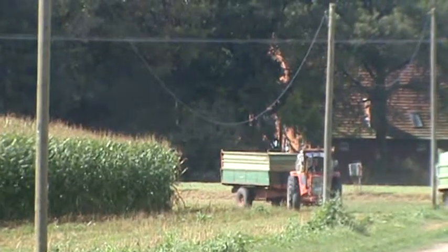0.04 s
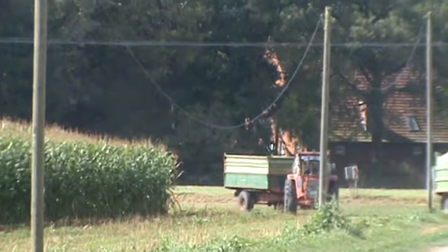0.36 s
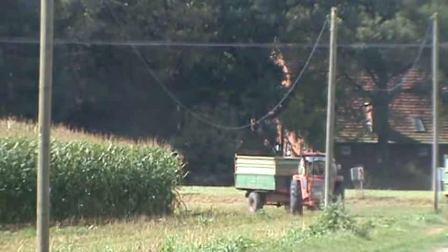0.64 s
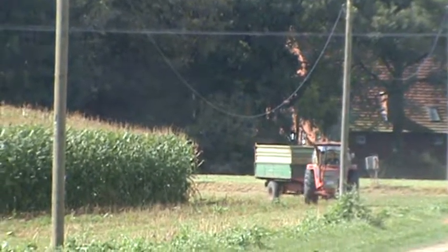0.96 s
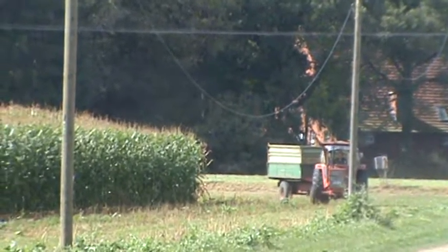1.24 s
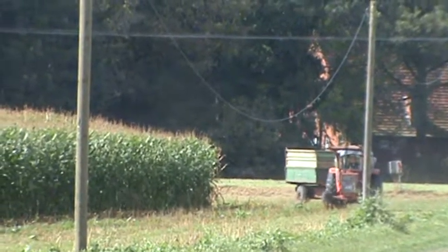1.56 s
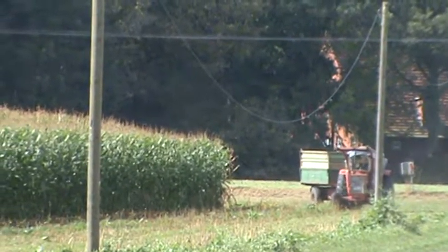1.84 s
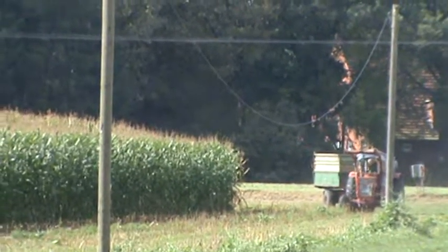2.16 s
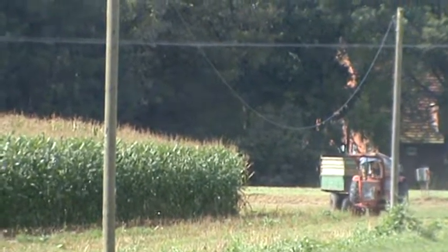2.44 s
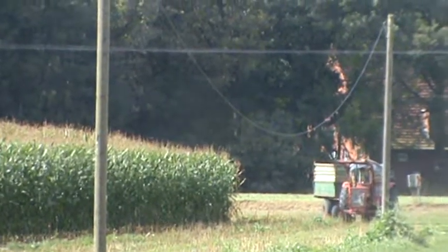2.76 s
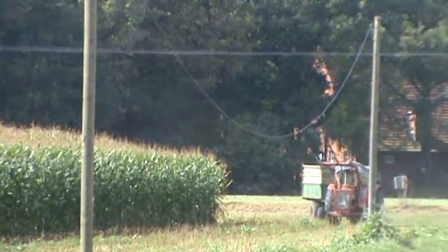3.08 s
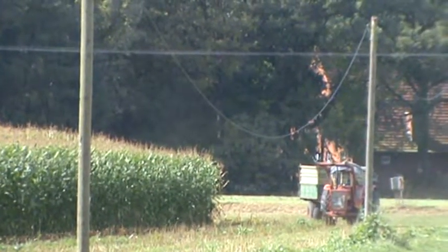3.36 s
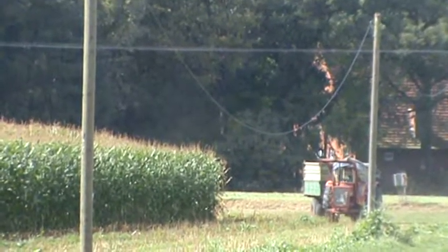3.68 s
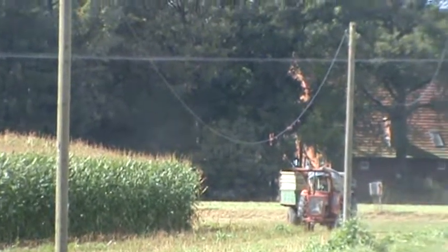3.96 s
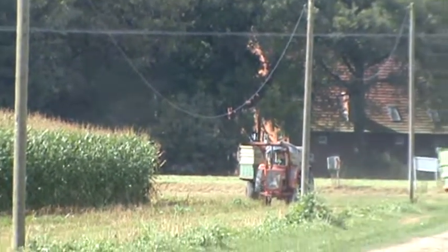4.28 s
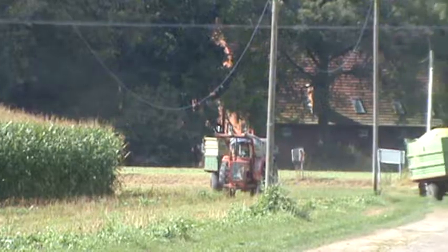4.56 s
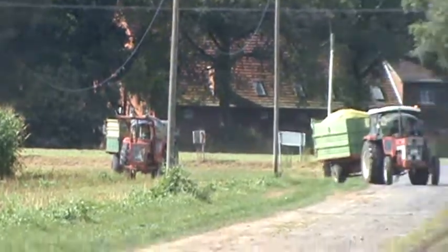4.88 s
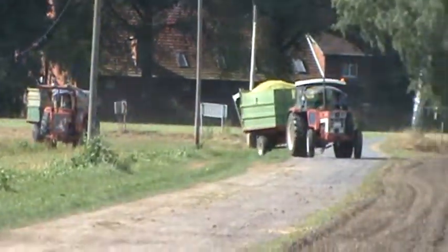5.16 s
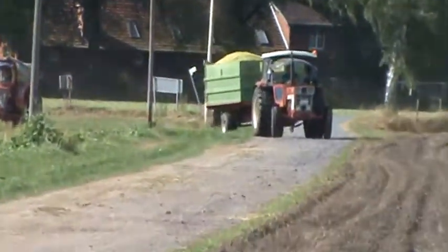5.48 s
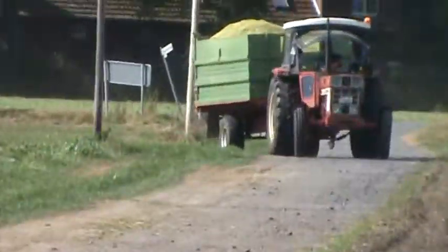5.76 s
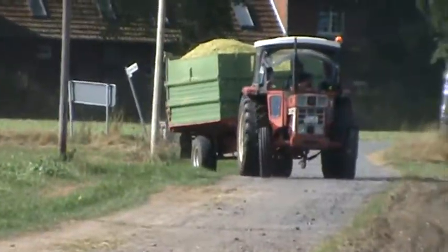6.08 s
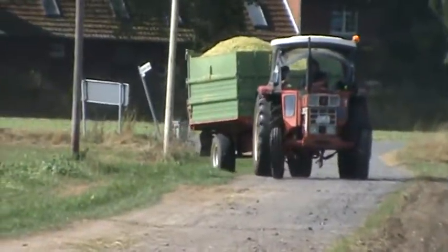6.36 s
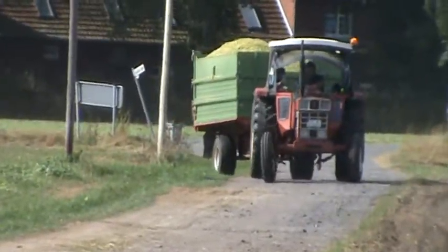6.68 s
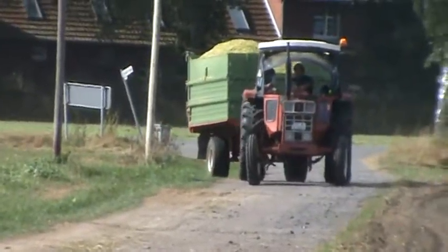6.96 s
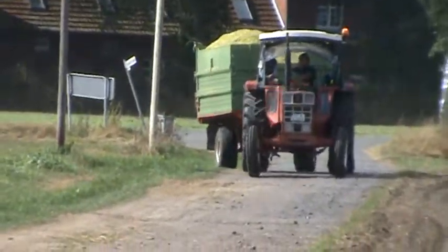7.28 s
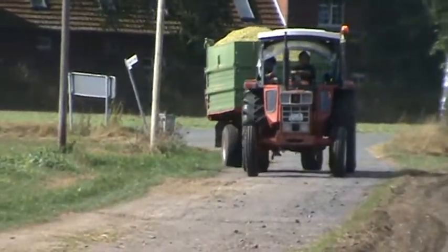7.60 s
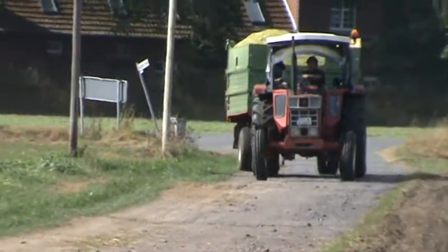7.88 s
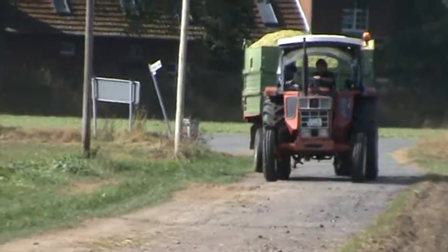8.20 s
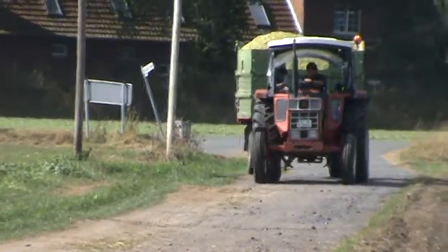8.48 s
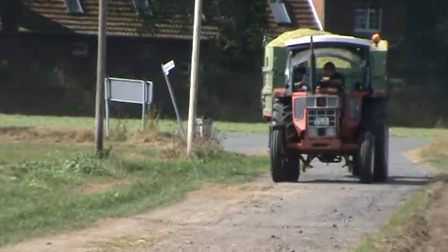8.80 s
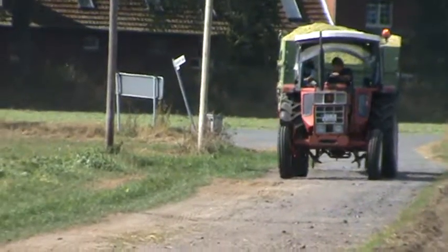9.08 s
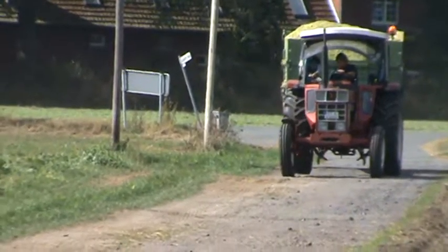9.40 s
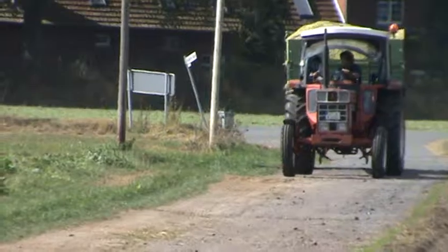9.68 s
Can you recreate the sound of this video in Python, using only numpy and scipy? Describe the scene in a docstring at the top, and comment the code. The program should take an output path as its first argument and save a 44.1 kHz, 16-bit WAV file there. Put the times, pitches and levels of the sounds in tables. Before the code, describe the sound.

Two tractors and a harvester make a low, steady diesel drone with a hiss of machinery, some way off across a field and slightly to the right. A cricket gives three high, scratchy trills in the first second, each softer than the last. Soft low thuds and dull tripod knocks come around 1 second, and a small click just after 2. Light wind puffs touch the microphone from about 4 seconds. Two dry clicks just after 5 seconds lead into a faint, brief zoom whir. Near 6.7 seconds the closer tractor opens its throttle, humming louder with a diesel rattle. From about 7 seconds wind builds and buffets the microphone hard until the end near 10, the loudest sound, with sharp pops around 7.7, 8.9 and 9.5 seconds. The cricket trills faintly under the gusts. A very faint high electronic whine and hiss run throughout.

```python
"""A low diesel drone comes first: two tractors and a harvester, far off beside a maize field.
A cricket trills in the grass by scraping its wings. Low thuds sound, the camera's tripod knocks, its switch
clicks and its zoom motor whirs, over a faint whine and hiss from its electronics. The near tractor opens
its throttle and rattles. Wind puffs at the camera's two microphone openings, then buffets them hard."""
import sys
import numpy as np
from scipy import signal
from scipy.fft import rfft, irfft, next_fast_len
from scipy.io import wavfile
from scipy.ndimage import uniform_filter1d, map_coordinates

SR = 44100
rng = np.random.default_rng(int(sys.argv[2]) if len(sys.argv) > 2 else 0)


def bounce(signal):
    """Save signal as a 16-bit WAV file at the path given by the first command-line argument."""
    frames = np.transpose(np.atleast_2d(signal))
    limited = np.clip(frames, -1, 1)
    pcm = np.round(limited * 32767).astype(np.int16)
    wavfile.write(sys.argv[1], SR, pcm)


N = 433944
TIME = np.arange(N) / SR

# Levels are relative: filters and other gains act on them later. Likeness 1 means left equals right.
# how fast each tractor fires and the harvester's shaft turns: t/s, f/Hz
NEAR_RATE = [(0, 61.7), (0.8, 62.43), (1.5, 58.97), (2.1, 60.17), (2.9, 60.1), (3.6, 60.76), (5.6, 61.1),
             (6, 59.84), (6.5, 56.9), (7, 58.05), (7.5, 64.25)]
FAR_RATE = [(0, 45.76), (0.7, 43.3), (1.4, 43.57), (1.9, 42.15), (2.6, 41.36), (3.2, 39.73), (3.9, 41.4),
            (5.7, 43.3), (6.6, 45.76)]
HARVESTER_RATE = [(0, 33.3), (0.9, 33.86), (1.6, 30.78), (2.3, 32.63), (3.1, 32.7), (3.8, 33.19),
                  (5.7, 32.99), (6.3, 31.8)]
# how loud each engine hums: t/s, level/dB
NEAR_LEVEL = [(0, -45), (1.8, -39), (3.4, -43.5), (5.7, -45), (6.4, -37), (7.1, -33)]
FAR_LEVEL = [(0, -43.5), (3, -48), (5.5, -40), (6.6, -44.5)]
HARVESTER_LEVEL = [(0, -45), (1.6, -41.5), (2.5, -47), (3.2, -40), (5.6, -41), (6.3, -51)]
# the tones in each hum: multiple of the engine's rate, level/dB
NEAR_TONES = [(1, -7), (1.5, -25), (2, -4.5), (2.5, -23), (3, -15.5), (4, -17.5), (5, -14.5), (8, -26)]
FAR_TONES = [(1, -4.5), (2, 1), (3, -13), (4, -13.5), (5, -18), (7, -14)]
HARVESTER_TONES = [(4, -24), (5, -1), (6, -2), (7, -12.5), (8, -12.5), (9, -9), (10, -3.5), (11, -8.5)]
# the ground cancels the drone above this edge: t/s, f/Hz
GROUND_EDGE = [(2.3, 366), (3.2, 300), (4.2, 272.5)]
# tone colour of the exhaust roar, machinery hiss and diesel knock: f/Hz, level/dB
ROAR_COLOUR = [(20, -32), (40, -18), (60, -1.5), (130, -1), (190, 2), (250, -0.5), (310, -1), (420, -8),
               (490, 0.5), (1200, 12)]
MACHINERY_COLOUR = [(150, -20), (400, -4), (540, -9), (720, 1.5), (950, -5), (1250, -4), (1580, -7),
                    (1900, -5), (2350, -11), (2850, -10), (3300, -16.5), (5000, -22.5), (8000, -36),
                    (15000, -47)]
KNOCK_COLOUR = [(500, -23), (1200, 2), (1900, 10), (2400, 5), (3000, 7.5), (3300, -6), (3800, -1),
                (4400, -30), (7000, -41)]
# how alike the two ears hear the roar and the machinery: f/Hz, likeness
ROAR_LIKENESS = [(100, 0.87), (300, 0.93), (600, 0.36)]
MACHINERY_LIKENESS = [(200, 0.15), (700, 0.48), (1400, 0.63), (3000, 0.43), (7000, 0.15)]
# loudness of the roar and of the machinery's treble: t/s, level/dB
ROAR_LOUDNESS = [(0, -42), (2.7, -44), (4.7, -38.5), (7.1, -43)]
MACHINERY_TREBLE = [(0, 3.5), (1.3, 2), (2.2, -2), (5, -0.5), (7.8, -3.5)]
# roar and machinery swell briefly: t/s, added share/dB, half-length/s
DIN_SWELLS = [(3.08, -6, 0.054)]
# the throttle opens and the diesel knocks: t/s, length/s, level/dB
THROTTLE_BURSTS = [(2.682, .25, -59.5), (6.672, 0.557, -49.5), (7.361, 0.086, -47.5)]

# the electronics' whining tones and the colour of their hiss: f/Hz, level/dB
WHINE_TONES = [(15525, -70), (15574, -76), (15622, -61.5), (15676, -75), (15725, -79)]
HISS_COLOUR = [(100, 0), (5000, -0.038), (10000, 0), (15000, -.5)]
# how alike the two ears hear that hiss: f/Hz, likeness
HISS_LIKENESS = [(4000, 0.18), (8000, 0.43), (12000, 0.82), (15000, 1.0)]

# cricket trills, a long soft one running under the last few: t/s, length/s, level/dB, f/Hz
TRILLS = [(0.08, 0.349, -40.5, 4740), (0.444, .25, -46, 4840), (0.859, 0.32, -53, 4760),
          (7.7, 2.13, -63, 4720), (7.809, 0.21, -53, 4700), (8.11, 0.25, -57, 4710),
          (8.681, 0.094, -63, 4740), (8.9, 0.19, -66.5, 4700), (9.221, 0.14, -69, 4730),
          (9.47, 0.15, -63, 4770), (9.72, .12, -63, 4730)]
# colour of the wings' scratch and of the song scattered by grass: f/Hz, level/dB
SCRATCH_COLOUR = [(3000, -18), (4400, 0.5), (5200, 3), (5800, -11), (8200, -15.5), (11000, -34)]
GRASS_COLOUR = [(3000, -38), (4350, -9), (4700, 7), (5050, -12), (5600, -19), (9000, -55)]

# soft, low thuds from camera handling and a wind puff: t/s, level/dB, half-length/s
LOW_THUDS = [(.71, -37, 0.032), (1.2, -36, 0.057), (4.17, -36.5, 0.077), (5.18, -29.5, .012)]
# colour of those thuds: f/Hz, level/dB
THUD_COLOUR = [(20, -21), (65, 8.5), (130, 2), (260, -9), (450, -31), (1100, -29), (4000, -33.5),
               (9000, -67)]
# the tripod head jolts: t/s, level/dB
TRIPOD_JOLTS = [(1.128, -34), (1.186, -31), (1.219, -36.5)]
# the tones it rings with: f/Hz, level/dB, time to fade 60 dB/s
TRIPOD_TONES = [(76.8, 7, 0.11), (190, 5, 0.046), (780, -7, .04), (1005, -10, 0.11), (2280, -9.5, 0.053),
                (2620, -6.5, .025)]
# switch clicks: t/s, level/dB, time to fade 60 dB/s, treble limit/Hz
SWITCH_CLICKS = [(2.281, -33, .008, 9000), (5.1902, -19, 0.016, 18000), (5.3157, -24, 0.0088, 7500)]
# colour of the plastic case: f/Hz, level/dB
CASE_COLOUR = [(200, 3), (700, 4), (1800, -4), (2250, 7), (2800, -3), (6000, -6), (9000, -11.5),
               (15000, -11.5)]

# colour of the wind that both openings share, and of what differs between them: f/Hz, level/dB
WIND_MID = [(10, -21), (30, -8), (55, -3), (105, 0), (220, -3.5), (330, -11), (520, -19), (1000, -31.5),
            (2000, -47.5), (5000, -92)]
WIND_SIDE = [(10, -14), (35, -19), (80, 2.5), (150, 4), (250, 3), (400, -1.5), (650, -11), (1000, -19),
             (2000, -44), (5000, -74)]
# gusts: peak t/s, build-up/s, push/dB, flutter relative to the push/dB
WIND_GUSTS = [(4.22, 0.092, -33.5, -27), (4.82, 0.033, -36.5, -25), (5.18, 0.026, -37, -25),
              (5.46, .017, -29, -26), (6.66, 0.032, -34, -27), (7.67, 0.04, -21, -11.5),
              (7.91, 0.03, -23, -14), (8.03, 0.061, -29.5, -13), (8.32, .06, -44, -3),
              (8.46, 0.016, -19, -16.5), (8.65, 0.076, -28, -5.5), (8.76, .045, -24.5, -10),
              (8.9, 0.038, -32, -14), (9.02, .06, -31, -8.5), (9.28, 0.043, -31, -10),
              (9.47, 0.032, -25.5, -8), (9.58, 0.062, -23.5, -12.5), (9.701, 0.052, -32.5, -10),
              (9.77, 0.028, -21.5, -21.5), (9.84, 0.028, -34, -12)]
# the wind's steady push: t/s, level/dB
STEADY_WIND = [(6.8, -50), (7.15, -34), (7.55, -23.5), (8.2, -24.5), (8.8, -20), (9.3, -26), (9.84, -27)]
# sharp slaps of air: t/s, level/dB, half-length/s
AIR_SLAPS = [(7.668, -27, 0.00093), (8.413, -28, 0.0031), (8.646, -35, .003), (8.92, -41, 0.0014),
             (9.428, -30, .002), (9.456, -35, 0.0025), (9.692, -36, .002), (9.747, -33.5, .002)]
# three sharp pops break into the wind: t/s, pop height, time the rumble stays mono/s
WIND_POPS = [(7.669, 0.84, 0.13), (8.919, 0.3, 0.0019), (9.463, 0.52, 0.067)]

# zoom motor tones: start t/s, end t/s, f/Hz, top level/dB
MOTOR_TONES = [(5.37, 5.88, 11611, -68), (5.76, 5.88, 6644, -65)]
# whirs of the zoom gears: t/s, level/dB, half-length/s
GEAR_WHIRS = [(5.35, -60, .04), (5.51, -54.5, .025), (5.66, -54.5, 0.076)]
# colour of the gears: f/Hz, level/dB
GEAR_COLOUR = [(800, -13), (2000, 8), (5500, -5), (8000, -6), (15000, -17)]


def amp(db):
    """Turn decibels into a gain."""
    return 10 ** (np.asarray(db) / 20)


def unit(x):
    """Scale a signal to an average strength (rms) of 1."""
    return x / np.sqrt(np.mean(x ** 2) + 1e-20)


def along(points, hz):
    """Read between (frequency, value) points on a log frequency axis."""
    f, v = np.transpose(points)
    return np.interp(np.log(hz + 1), np.log(f + 1), v)


def curve(points):
    """Join (time, value) points with straight lines."""
    return np.interp(TIME, *np.transpose(points))


def wobble(rate):
    """A smooth random curve through `rate` points a second."""
    return map_coordinates(rng.standard_normal(int(N * rate / SR) + 4), [TIME * rate])


def filtered(x, response):
    """Scale each frequency in x by response(hz)."""
    size = next_fast_len(N + 8192)
    return irfft(rfft(x, size) * response(np.fft.rfftfreq(size, 1 / SR)), size)[..., :N]


def noise(colour):
    """Noise of strength 1 with the given tone colour."""
    return unit(filtered(rng.standard_normal(N), lambda hz: amp(along(colour, hz))))


def stereo(mid, side):
    """Left and right from what they share (mid) and what sets them apart (side)."""
    return np.array([mid + side, mid - side])


def wide(colour, likeness):
    """Stereo noise: the less alike its two sides, the wider it sounds."""
    apart = lambda hz: np.tan(np.arccos(np.clip(along(likeness, hz), -.9, 1)) / 2)
    return stereo(noise(colour), filtered(noise(colour), apart))


def sine(hz, db):
    """A steady tone with a random starting phase."""
    return np.sqrt(2) * amp(db) * np.sin(2 * np.pi * hz * TIME + rng.uniform(0, 2 * np.pi))


def swells(rows):
    """Bell-shaped rises of level."""
    return sum(amp(db) * np.exp(-.5 * ((TIME - s) / half) ** 2) for s, db, half in rows)


def burst(start, length, attack_s, release_s, growth_db):
    """Fade in, grow to half of growth_db below full level, then fade out."""
    age, hold = TIME - start, max(length, attack_s)
    gate = np.interp(age, [0, attack_s, hold, hold + release_s], [0, 1, 1, 0])
    return gate * amp(growth_db * (np.clip(age / length, 0, 1) - 1.5))


def turns(rate, unsteady):
    """Count the cycles of an engine whose speed wanders a little."""
    return np.cumsum(curve(rate) * (1 + unsteady * wobble(7))) / SR


def puffs(cycles, sharp):
    """One smooth rise of level per engine cycle."""
    return unit(np.exp(sharp * np.cos(2 * np.pi * cycles)))


def exhaust_hum(cycles, level, partials, fading_db, blur):
    """An engine's tones; moving air makes each fade and drift, and the high ones drift more."""
    tones = 0
    for multiple, db in partials:
        drift = rng.uniform(0, 2 * np.pi) + blur * np.sqrt(multiple) * wobble(9)
        gain = amp(db + fading_db * wobble(3.01))
        tones = tones + gain * np.sin(2 * np.pi * multiple * cycles + drift)
    return amp(curve(level)) * unit(tones)


def over_ground(x, steep):
    """The bounce off soft soil cancels sound above an edge, which slides as the machines move."""
    hz, times, bands = signal.stft(x, SR, nperseg=2048)
    edge = np.interp(times, *np.transpose(GROUND_EDGE))
    loss = np.sqrt(1 + (hz[:, None] / edge) ** steep)
    return signal.istft(bands / loss, SR, nperseg=2048)[1][..., :N]


def exhaust_roar(cycles):
    """Low exhaust noise that puffs with each firing."""
    roar = unit(over_ground(wide(ROAR_COLOUR, ROAR_LIKENESS), steep=10.1))
    return amp(curve(ROAR_LOUDNESS) + 0.45 * wobble(5)) * roar * puffs(cycles, sharp=0.28)


def shimmer(x, patchy_db):
    """Many shifting paths through the air lift and drop narrow bands of sound."""
    bands = signal.stft(x, SR, nperseg=2048)[2]
    patches = uniform_filter1d(rng.standard_normal(bands.shape[1:]), size=3, axis=0)
    patches = uniform_filter1d(patches, size=16, axis=1)
    return signal.istft(bands * amp(patchy_db * unit(patches)), SR, nperseg=2048)[1][:, :N]


def machinery(cycles, start_db=-48, approach_db_per_s=0.3):
    """The hiss of moving parts, growing as the tractors come nearer."""
    hiss = shimmer(wide(MACHINERY_COLOUR, MACHINERY_LIKENESS), patchy_db=1.95)
    hiss = hiss * puffs(cycles, sharp=0.092)
    treble = filtered(hiss, lambda hz: 1 - 1 / (1 + (hz / 1600) ** 4))
    gain = amp(start_db + approach_db_per_s * TIME + .5 * wobble(6))
    return gain * (hiss + (amp(curve(MACHINERY_TREBLE)) - 1) * treble)


def diesel_knock(cycles, idle_db=-65.5):
    """Each squirt of fuel burns with a knock, louder when the throttle opens."""
    throttle = sum(amp(db) * burst(s, length, attack_s=0.034, release_s=.07, growth_db=1.2)
                   for s, length, db in THROTTLE_BURSTS)
    gain = (amp(idle_db) + throttle) * amp(1.9 * wobble(30))
    return gain * noise(KNOCK_COLOUR) * puffs(cycles, sharp=1.2)


def engines():
    """Three diesels hum, roar and clatter, a little to the right."""
    near, far, shaft = turns(NEAR_RATE, 0.0035), turns(FAR_RATE, 0.0037), turns(HARVESTER_RATE, 0.0019)
    hum = (exhaust_hum(near, NEAR_LEVEL, NEAR_TONES, fading_db=2.2, blur=.25)
           + exhaust_hum(far, FAR_LEVEL, FAR_TONES, fading_db=2.0, blur=0.17)
           + exhaust_hum(shaft, HARVESTER_LEVEL, HARVESTER_TONES, fading_db=0.5, blur=0.15))
    surge = 1 + swells(DIN_SWELLS)
    drone = over_ground(hum, steep=18.5) + surge * exhaust_roar(near)
    clatter = surge * machinery(far) + diesel_knock(near)
    return drone * amp([[-.9], [.9]]) + clatter * amp([[-.3], [.3]])


def electronics():
    """The camera's circuits whine very high and its amplifier hisses."""
    whine = sum(sine(hz, db) for hz, db in WHINE_TONES)
    return whine + amp(-59) * wide(HISS_COLOUR, HISS_LIKENESS)


def cricket(wing_hz=44.84, stroke_s=0.0019, sweep=0.032, drift=0.0045, scratch_db=-9.5, uneven_db=4.5):
    """Each wing stroke is a short, scratchy, falling tone; trills swell, and the grass scatters them."""
    cycles = TIME * wing_hz + 0.04 * wobble(25)
    stroke = np.abs(cycles + .5).astype(int)
    size_db, detune = (rng.standard_normal((stroke.max() + 1, 2)) * [uneven_db, .006])[stroke].T
    from_centre = (cycles - stroke) / wing_hz / stroke_s
    pulses = unit(np.exp(-.5 * from_centre ** 2) * amp(size_db))
    loudest_db = max(row[2] for row in TRILLS)
    direct, scattered, pitch = 0, 0, TRILLS[0][3]
    for s, length, db, hz in TRILLS:
        trill = amp(db) * burst(s, length, attack_s=0.017, release_s=.025, growth_db=5.5)
        direct = direct + trill
        share = amp(-9.5 + .3 * (loudest_db - db))  # fainter trills scatter a larger share
        scattered = scattered + trill * share
        pitch = np.where(TIME > s, hz, pitch)
    pitch = pitch * (1 + drift * wobble(7.7) + detune - sweep * np.tanh(from_centre / 2))
    tone = np.sqrt(2) * np.sin(2 * np.pi * np.cumsum(pitch) / SR)
    song = pulses * (tone + amp(scratch_db) * noise(SCRATCH_COLOUR))
    return direct * song + scattered * wide(GRASS_COLOUR, likeness=[(4700, 0.67)])


def low_thuds():
    """Soft, low thuds from camera handling and a wind puff."""
    return swells(LOW_THUDS) * noise(THUD_COLOUR)


def tripod():
    """The tripod head shifts and rings with short, dull knocks."""
    ring = np.zeros(N)
    for s, db in TRIPOD_JOLTS:
        age = np.maximum(TIME - s, 0)
        for hz, tone_db, fade_s in TRIPOD_TONES:
            gain = amp(db + tone_db + rng.normal(0, 2.8) - 60 * age / fade_s)
            ring += gain * np.sin(2 * np.pi * hz * age)
    return ring


def switch_clicks(attack_s=0.00088):
    """The switch snaps, and the plastic case gives a dry click."""
    case, clicks = wide(CASE_COLOUR, likeness=[(2000, 0.15)]), 0
    for s, db, fade_s, top_hz in SWITCH_CLICKS:
        age = np.maximum(TIME - s, 0)
        snap = case * amp(db - 60 * age / fade_s) * (1 - np.exp(-(age / attack_s) ** 2))
        clicks = clicks + filtered(snap, lambda hz: 1 / (1 + (hz / top_hz) ** 8))
    return clicks


def buffet(colour, push, flutter, lumps_db, spit_db):
    """Air swirls at the microphone: big swirls give a lumpy rumble, small ones spit above it."""
    swirls = noise(colour)
    bass = filtered(swirls, lambda hz: 1 / (1 + (hz / 420) ** 4))
    spits = unit((swirls - bass) * amp(spit_db * wobble(130)))
    return unit(amp(lumps_db * wobble(45))) * (push * bass + flutter * spits)


def wind(collapse_s=0.02, pop_build_s=0.00085, pop_break_s=0.00019, pop_shared=0.16):
    """A few puffs, then gusts on a steady blow; three sharp pops break into the wind."""
    push = amp(curve(STEADY_WIND)) * (TIME > STEADY_WIND[0][0])
    flutter = amp(-24.5) * push + swells(AIR_SLAPS)
    for s, build_s, db, flutter_db in WIND_GUSTS:
        width_s = np.where(TIME < s, build_s, collapse_s)
        gust = amp(db) * np.exp(-.5 * ((TIME - s) / width_s) ** 2)
        push, flutter = push + gust, flutter + amp(flutter_db) * gust
    mid = buffet(WIND_MID, push, flutter, lumps_db=1.3, spit_db=3.5)
    side = buffet(WIND_SIDE, amp(0.6) * push, amp(8) * flutter, lumps_db=1.7, spit_db=2.0)
    for s, height, mono_s in WIND_POPS:
        # the rumble briefly turns mono; the pop's pressure builds, then breaks off
        side = side * np.interp(TIME, [s - .002, s, s + mono_s, s + mono_s + .019], [.94, .01, .01, .97])
        pressure = height * np.exp(-((TIME - s) / pop_build_s) ** 2)
        pop = pressure * np.clip((s + pop_build_s / 2 - TIME) / pop_break_s, 0, 1)
        mid, side = mid + pop_shared * pop, side + pop
    return stereo(mid, side)


def zoom():
    """The zoom motor sings thin, swelling tones while its gears whir."""
    motor = sum(sine(hz, db) * np.interp(TIME, [start, start + .02, end - .02, end], [0, .35, 1, 0])
                for start, end, hz, db in MOTOR_TONES)
    return motor + swells(GEAR_WHIRS) * wide(GEAR_COLOUR, likeness=[(4000, 0.33)])


def scene():
    """The sounds of the field plus the camera's own noises."""
    field = engines() + cricket() + wind()
    return field + tripod() + low_thuds() + switch_clicks() + zoom() + electronics()


def record(dry, top_hz=15850):
    """The camera clips at full scale and cuts off the highest treble."""
    return filtered(np.clip(dry, -1, 1), lambda hz: hz < top_hz)


dry = scene()
out = record(dry)
bounce(out)
```